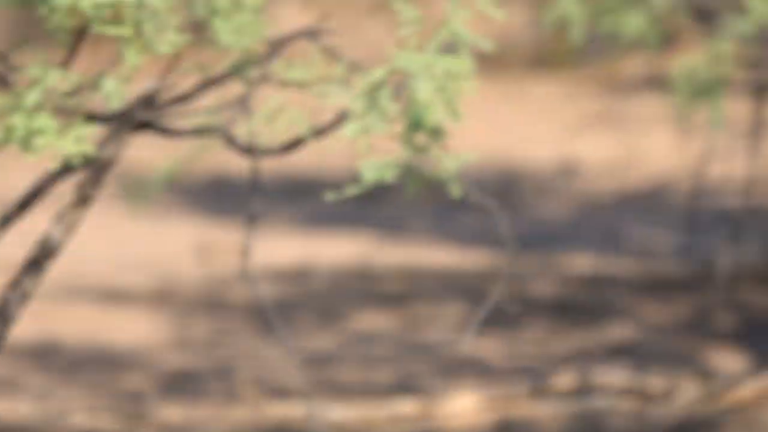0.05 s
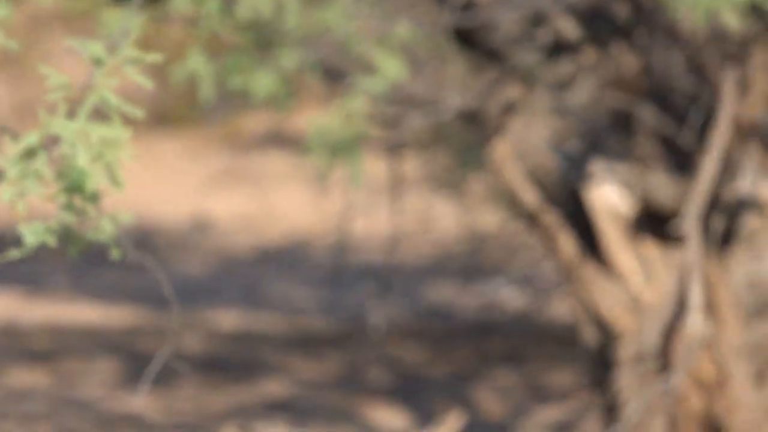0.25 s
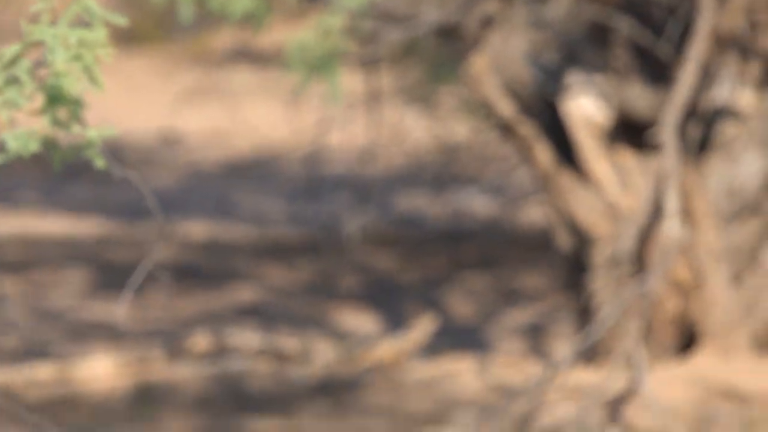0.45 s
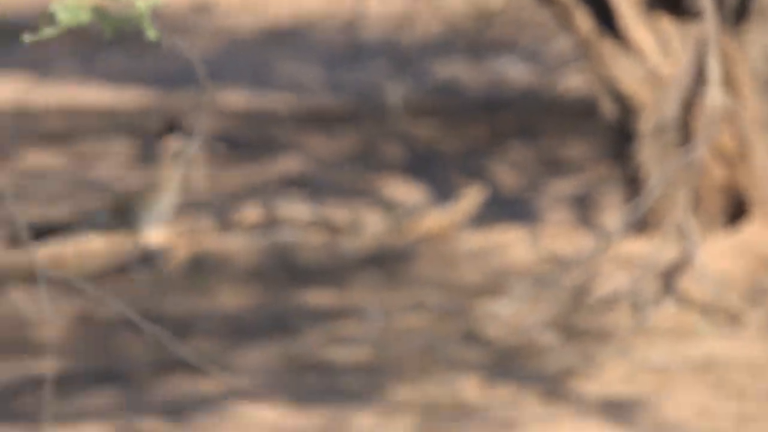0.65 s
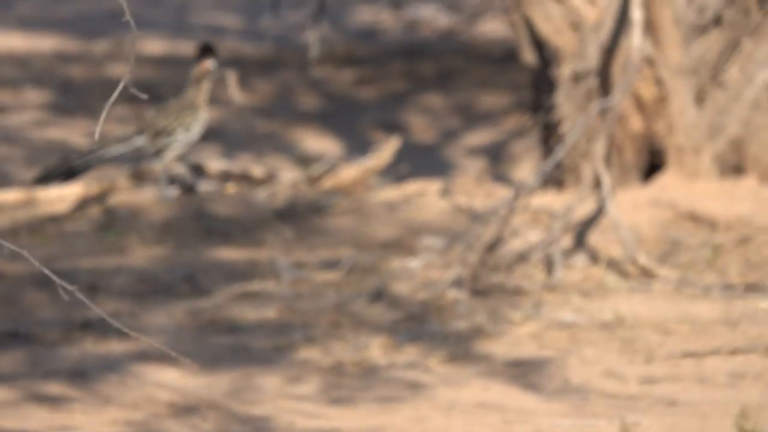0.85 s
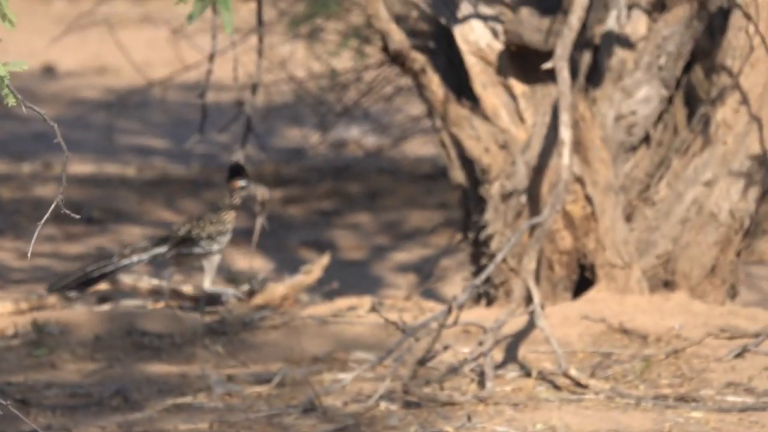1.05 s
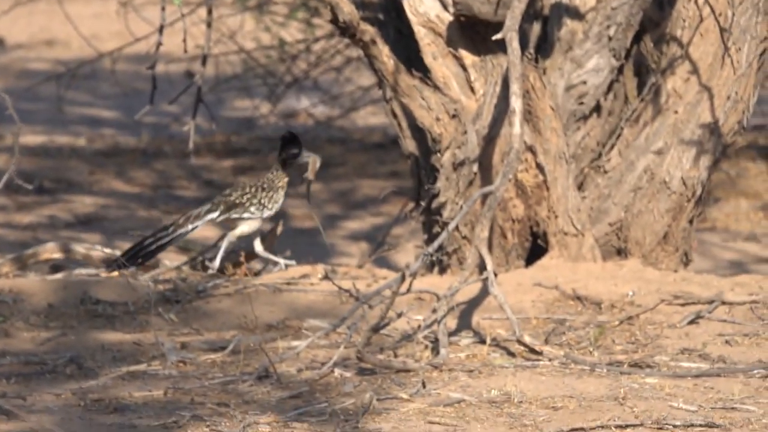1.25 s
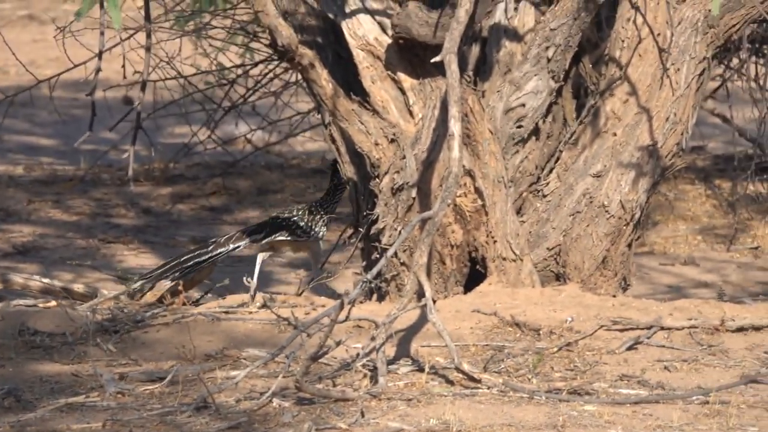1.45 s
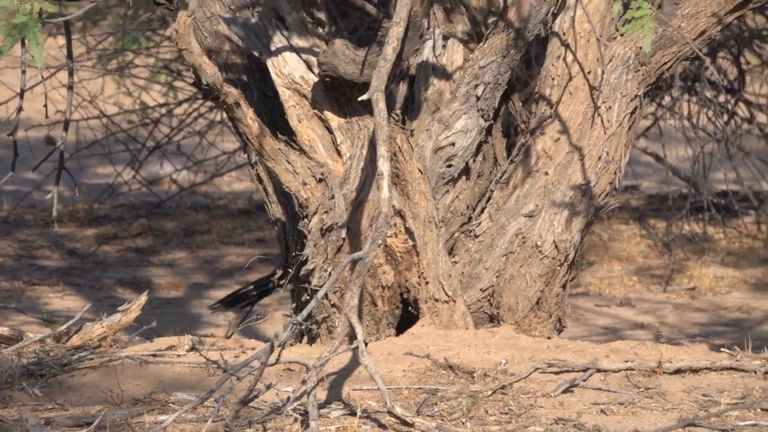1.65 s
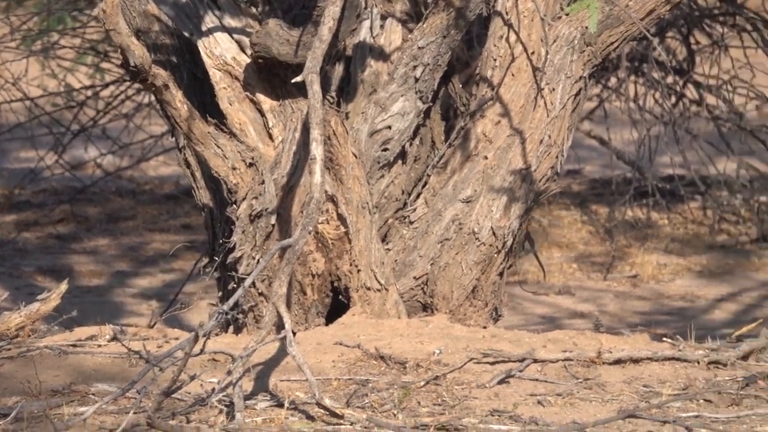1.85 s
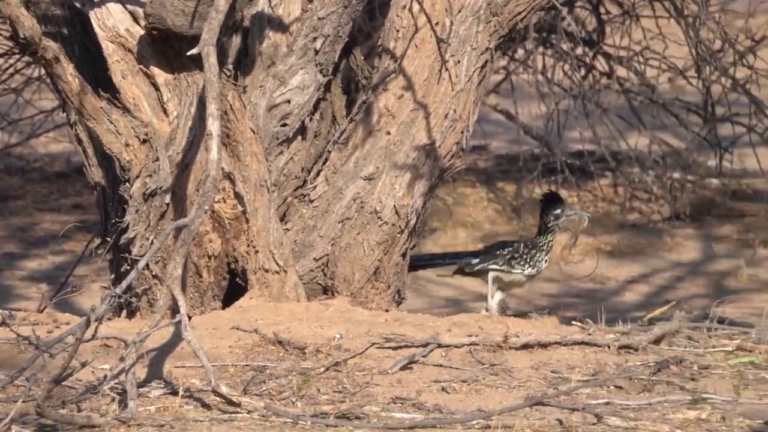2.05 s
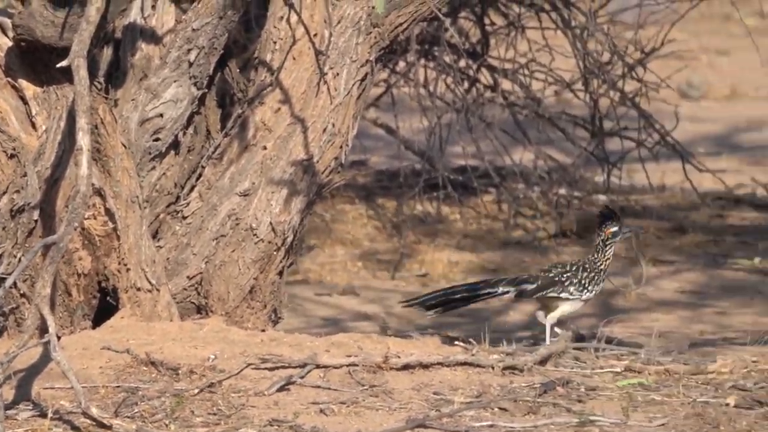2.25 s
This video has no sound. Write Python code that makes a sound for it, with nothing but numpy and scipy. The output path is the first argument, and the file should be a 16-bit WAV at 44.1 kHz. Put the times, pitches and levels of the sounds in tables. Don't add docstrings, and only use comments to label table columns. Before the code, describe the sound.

Cicadas hold a high, dense buzz throughout in open dry woodland; close to the microphone, hands thump and scuff the camera body early on, then a dial clicks, tiny gears tick and motors hum low.

```python
import sys
import numpy as np
from scipy import signal
from scipy.fft import rfft, irfft, next_fast_len
from scipy.io import wavfile
from scipy.ndimage import map_coordinates

SR = 44100
rng = np.random.default_rng(int(sys.argv[2]) if len(sys.argv) > 2 else 0)


def ratio_of_db(decibels):
    return 10 ** (np.asarray(decibels, float) / 20)


def generate_wav(sig):
    pcm = np.round(np.clip(np.atleast_2d(sig).T, -1, 1) * 32767).astype(np.int16)
    wavfile.write(sys.argv[1], SR, pcm)


N = 101429


def rms_one(x):
    return x / np.sqrt(np.mean(x ** 2) + 1e-20)


def in_time(rows):
    s, *columns = np.transpose(rows)
    return [np.interp(np.arange(N) / SR, s, column) for column in columns]


def at_hz(points, hz):
    points = np.array(points)
    return np.interp(np.log(hz), np.log(points[:, 0]), points[:, 1])


def balance(left_over_right_db):
    return ratio_of_db([[left_over_right_db / 2], [-left_over_right_db / 2]])


def drift(rate):
    r = np.exp(-80 * np.pi * rate / SR)
    noise = rng.standard_normal(N // 40 + 2002)
    slow = signal.lfilter([1], [1, -2 * r, r * r], noise)[2000:]
    return np.interp(np.arange(N) / 40, np.arange(len(slow)), rms_one(slow))


def ring(x, hz, t60):
    r = ratio_of_db(-60 / (t60 * SR))
    w = 2 * np.pi * hz / SR
    return signal.lfilter([0, np.sin(w)], [1, -2 * r * np.cos(w), r * r], x + 1e-18)


def resonate(x, peaks):
    out = 0
    for k, (hz, width, db) in enumerate(peaks):
        r = np.exp(-np.pi * 1.5 * width / SR)
        turn = 2 * np.pi * hz / SR
        sos = [(1 - r * r) / 2, 0, (r * r - 1) / 2, 1, -2 * r * np.cos(turn), r * r]
        out = out + (-1) ** k * ratio_of_db(db) * signal.sosfilt([sos, sos], x)
    return out


def coloured(spectrum, patchy_db, low_hz, high_hz):
    # (frequency [Hz], likeness [0..1])
    likeness = [(60, 1), (250, 0.96), (800, 0.97), (2500, 0.49), (5000, 0.07), (9000, 0.58), (12500, 0.55),
                (15000, 0.68)]
    size = next_fast_len(N)
    f = np.maximum(np.fft.rfftfreq(size, 1 / SR), 1)
    alike = np.clip(at_hz(likeness, f), -.99, .99)
    mid, side = rfft(rng.standard_normal((2, size)))
    pair = np.sqrt(1 + alike) * mid + np.sqrt(1 - alike) * side * [[1], [-1]]
    pair = pair * ratio_of_db(at_hz(spectrum, f))
    pair = pair / (1 + (low_hz / f) ** 8) / (1 + (f / high_hz) ** 8)
    octave = np.log2(f / 25)
    shared = drift(6)
    out = 0
    for k in range(11):
        band = irfft(pair * np.clip(1 - abs(octave - k), 0, 1), size)[:, :N]
        out = out + band * ratio_of_db(patchy_db * (shared + drift(13.7)))
    return rms_one(out)


def delayed(x, ms):
    return map_coordinates(x, [np.arange(N) - ms * SR / 1000], order=3, mode="mirror")


def singer(rate, weak_db, peaks, pan_db):
    jitter_s, spread_db = .0001, .8
    ragged, tail_s = .2, .0004
    turns = np.cumsum(rate * np.ones(N)) / SR
    at = np.flatnonzero(np.diff(turns.astype(int)))
    jitter = (jitter_s * SR * rng.standard_normal(len(at))).astype(int)
    at = np.clip(at + jitter, 0, N - 1)
    every_other = np.arange(len(at)) % 2
    buckles = np.zeros(N)
    buckles[at] = ratio_of_db(spread_db * rng.standard_normal(len(at)) + weak_db * every_other)
    tail = signal.lfilter([ragged], [1, -np.exp(-1 / (tail_s * SR))], buckles)
    tail = tail * rng.standard_normal((2, N))
    mid, side = resonate(tail + buckles * [[2], [0]], peaks)
    return rms_one(mid + 1.53 * side * [[1], [-1]]) * balance(pan_db)


def cicadas():
    # (time [s], rate [pulses per s])
    near_rate = [(.15, 159.9), (.8, 157.9), (1.4, 158.8), (1.8, 159.8), (2.3, 159.2)]
    # (time [s], level [dB], far chorus against it [dB])
    insects = [(0, -46, 4.5), (.15, -45, 4), (.4, -44, -0.5), (.62, -43.5, 0), (1.4, -46, 1.5),
               (1.72, -47, -1.5), (2.3, -46.5, 1)]
    # (frequency [Hz], width [Hz], level [dB])
    tymbal = [(9240, 490, 3.5), (9730, 830, -7), (10970, 1330, -9), (9200, 900, -12), (13000, 700, -19.5)]
    # (frequency [Hz], width [Hz], level [dB])
    low_tymbal = [(6508, 440, 3), (7720, 520, 1), (6203, 345, -1.5), (8060, 340, -1)]
    # (frequency [Hz], level [dB])
    chorus = [(7000, -30), (8000, -18.5), (8600, -12), (9350, -10), (11700, -13.5), (13100, -23),
              (13600, -31), (15000, -25.5), (16000, -32)]
    # (time [s], level [dB], left over right [dB])
    low_kind = [(0, -56.5, 6), (.4, -53, 1.5), (.9, -57, 2.5), (1.4, -56, 0), (1.7, -63, 9),
                (2.3, -63.5, 14)]
    # (time [s], delay [ms], share of the direct sound)
    hand_echo = [
        (0, .336, .35),
        (.12, .31, .4),
        (.26, .293, .3),
        (.45, .29, 0),
    ]
    second_rate, weak_db = 310.8, -4

    near = ratio_of_db(-3) * singer(in_time(near_rate)[0], 0, tymbal, pan_db=4.0)
    second = ratio_of_db(-11) * singer(second_rate, weak_db, tymbal, pan_db=2.5)
    far = ratio_of_db(-3.5) * coloured(chorus, .05, 5200, 17600) * balance(2.5)
    level_db, far_db = in_time(insects)
    high = ratio_of_db(level_db) * (near + second + ratio_of_db(far_db) * far)

    ms, share = in_time(hand_echo)
    echo = [delayed(channel, ms) for channel in high]
    high = (high + share * echo) / np.sqrt(1 + share ** 2)

    mid, side = resonate(rng.standard_normal((2, N)), low_tymbal)
    low = rms_one(mid + 0.63 * side * [[1], [-1]])
    low = low + 0.83 * singer(second_rate, weak_db, low_tymbal, pan_db=0)
    low[1] = delayed(low[1], .17)
    low_db, pan_db = in_time(low_kind)
    return high + ratio_of_db(low_db + pan_db * [[.5], [-.5]]) * low


def knocks():
    # (time [s], peak [dB], contact [ms])
    hits = [(0.2057, -8, 1.2), (0.2134, -15.5, 4.1), (0.2193, -8.5, 1.08), (0.2283, -15.5, 3.1),
            (.248, -20, 0.46), (.2522, -13.5, 1.6), (0.2559, -19, 1.3), (0.2608, -19, 2.3),
            (.268, -21, 2.6), (0.2847, -14, 1.54), (0.4256, -18, 2.0), (0.4406, -13.5, 0.89),
            (.4487, -7.5, 1.27), (.457, -14, 1.5), (.62, -32, 3.2), (0.63, -29, 4.8), (0.6538, -26.5, 1.4),
            (.662, -25, 2.7), (0.6632, -22.5, .8), (.671, -21, 3), (.679, -22.5, 5.3), (0.7199, -14, 1.26),
            (0.7289, -19, 2.34)]
    # (frequency [Hz], level [dB], t60 [s])
    body = [
        (115.3, -8, 0.064),
        (239, -16.5, 0.03),
        (44.7, -42, 0.11),
    ]
    t = np.arange(N) / SR
    push = np.zeros(N)
    for s, db, ms in hits:
        u = np.clip((t - s) / (ms * 0.00024) + 2, 0, 60)
        push -= ratio_of_db(db) * u ** 2 * np.exp(2 - u) / 4
    rung = sum(ratio_of_db(db) * 2 * np.pi * hz / SR * ring(push, hz, t60) for hz, db, t60 in body)
    push = signal.lfilter(*signal.butter(4, 1600, fs=SR), push)
    mid = signal.lfilter(*signal.butter(1, 60, "high", fs=SR), push) - rung
    edge = signal.lfilter(*signal.butter(1, [400, 1200], "band", fs=SR), mid)
    return mid + 0.2 * edge * [[-1], [1]]


def swell(s, length, db):
    part = np.clip((np.arange(N) / SR - s) / length, 0, 1)
    return ratio_of_db(db) * np.sin(np.pi * part) ** 1.3


def hands():
    # (time [s], level [dB])
    rub_level = [(0, -42), (.12, -47), (.18, -50.5), (.37, -47.5), (.55, -47.5), (.79, -52.5), (.95, -55.5),
                 (1.12, -55), (1.24, -60.5), (1.36, -53), (1.45, -57.5), (1.68, -65.5), (2.3, -68.5)]
    # (frequency [Hz], level [dB])
    rub_colour = [(25, -8), (55, 12.5), (217, -15), (377, -1.5), (663, -5), (1340, -5), (2420, -24.5),
                  (5000, -33.5)]
    # (time [s], length [s], level [dB])
    scuff_rows = [
        (0.177, .14, -29.5),
        (0.405, 0.073, -34.5),
        (0.484, 0.024, -35),
        (0.612, 0.031, -43),
        (0.64, 0.055, -36),
        (0.528, 0.091, -50.5),
    ]
    # (frequency [Hz], level [dB])
    scuff_colour = [(60, 5.5), (236, -8), (1560, -20), (2160, -26), (3300, -42.5), (6000, -39)]
    # (time [s], length [s], level [dB], centre
    # [Hz])
    slide_rows = [(0.76, 0.33, -53.5, 1420), (0.449, 0.1, -57, 2370), (1.2, 0.13, -57, 1160),
                  (1.32, 0.094, -62, 3600), (1.33, 0.076, -60, 2600), (1.443, 0.16, -66, 2670),
                  (.605, .03, -48, 1200), (0.43, 0.35, -39.5, 57), (2.1, 0.36, -57.5, 340),
                  (0.37, .08, -54, 1460), (1.55, .12, -57.5, 740)]

    rub = ratio_of_db(in_time(rub_level)[0] + 3.5) * coloured(rub_colour, 1.3, 45, 9800)

    mid, side = rng.standard_normal((2, N))
    side = signal.lfilter(*signal.butter(1, 300, "high", fs=SR), side)
    cloth = mid + 0.71 * side * [[1], [-1]]
    slides = 0
    for s, length, db, hz in slide_rows:
        slides = slides + swell(s, length, db) * rms_one(resonate(cloth, [(hz, 0.19 * hz, 0)]))

    grain_db, grains_per_s = 3, 90
    scuffs = sum(swell(*row) for row in scuff_rows) * coloured(scuff_colour, 1.74, 76, 8100)
    return rub + slides + scuffs * ratio_of_db(grain_db * drift(grains_per_s))


def through_body(x):
    # (frequency [Hz], phase [radians])
    port_lag = [(50, .1), (300, .7), (700, .8), (1700, .2)]
    size = 2 ** 17
    lag = at_hz(port_lag, np.maximum(np.fft.rfftfreq(size, 1 / SR), 1))
    return irfft(rfft(x, size) * np.exp(.5j * lag * [[1], [-1]]))[:, :N]


def place(out, s, hit, gain):
    start = int(s * SR)
    out[:, start:start + len(hit)] += gain * hit / abs(hit).max()


def dial_clicks():
    # (time [s], peak [dB], ring [Hz], crack [dB])
    snaps = [(1.1345, -46, 1700, 0), (1.3118, -45, 4600, 7), (1.3212, -35, 1100, 4),
             (1.3235, -35, 1500, -9), (1.3495, -42, 4600, 6), (1.3515, -39, 1150, -9),
             (1.3858, -27, 3400, 4), (1.3862, -33, 4500, 0), (1.3875, -34, 2500, -3),
             (1.3895, -34, 1050, -9), (1.5045, -50, 4200, 0), (1.506, -49, 2500, -6),
             (1.5555, -51, 1900, 0), (1.5955, -44, 1000, -15)]
    # (frequency [Hz], level [dB])
    shell = [(1000, -8), (1600, 3), (2500, 0), (3500, -3.5)]
    out = np.zeros((2, N))
    t = np.arange(1500) / SR
    for s, db, hz, crack_db in snaps:
        crack = rng.standard_normal(len(t)) * np.exp(-t / .0014)
        dull_crack = signal.lfilter(*signal.butter(1, 9000, fs=SR), crack)
        hit = ratio_of_db(4 + crack_db) * dull_crack + 0.45 * ring(crack, hz, .01)
        hit = hit + sum(0.083 * ratio_of_db(g) * ring(crack, f, 0.0093) for f, g in shell)
        place(out, s, hit, ratio_of_db(db))
    return out


def gear_ticks():
    # (time [s], peak [dB], share of the lower notes [dB])
    touches = [
        (1.6957, -52, -8),
        (1.7545, -44, -1),
        (1.9033, -45, 3),
        (1.981, -45, -8),
        (2.0555, -43, -2),
        (2.2065, -48, 4),
        (2.245, -50, -10),
    ]
    # (frequency [Hz], level [dB])
    gear = [(7600, 0), (7100, -4), (6200, -6), (5200, -9), (4000, -18), (2700, -22)]
    out = np.zeros((2, N))
    t = np.arange(1500) / SR
    for s, db, low_db in touches:
        touch = np.exp(-t / .00002) + .1 * rng.standard_normal(len(t)) * np.exp(-t / .001)
        hit = sum(ratio_of_db(g + low_db * (hz < 6000)) * ring(touch, hz, .012) for hz, g in gear)
        place(out, s, hit, ratio_of_db(db) * balance(-3))
    return out


def motors():
    # (time [s], slow motor level [dB], fast motor level [dB])
    hum = [(0, -55, -57.5), (.45, -43, -49.5), (.7, -44, -40.5), (.95, -47, -43), (1.298, -41.5, -45.5),
           (1.5, -44, -40.5), (1.75, -43, -46.5), (1.872, -37.5, -38), (2.02, -36, -37), (2.18, -45, -43),
           (2.3, -51.5, -45)]
    # (multiple of its speed, level [dB], share by which it outgrows the motor)
    slow_orders = [(2, 1, 0.0), (3, -10, 0.94), (4, -23.5, 0.31), (5, -33, 0.98)]
    fast_orders = [(1, -4, -0.81), (2, -0.5, 0.34), (4, -24, 0.054)]
    # (frequency [Hz], width [Hz], level [dB])
    whine_lines = [(1734, 130, -67), (2206, 160, -75.5), (2840, 330, -72.5)]
    # (frequency [Hz], level [dB])
    rumble_colour = [(30, 2), (70, 0), (140, -17), (220, -10), (450, -12), (700, -33)]
    slow_db, fast_db = in_time(hum)
    out = 0
    for hz, orders, level in ((60.16, slow_orders, slow_db), (79.5, fast_orders, fast_db)):
        phase = 2 * np.pi * np.cumsum(hz * (1 + 0.0017 * drift(3.3))) / SR
        for k, db, grows in orders:
            waver_db = 1.2 * drift(4.1) * (k != 2) + 1.6 * drift(21.0)
            gain = ratio_of_db(level + db + grows * (level + 42.5) + waver_db)
            out = out + np.sqrt(2) * gain * np.sin(round(k) * phase + rng.uniform(0, 2 * np.pi))

    rumble = ratio_of_db(fast_db - 15 + 0.1 * (fast_db + 48)) * coloured(rumble_colour, 0.27, 34, 750)

    whine = 0
    for hz, width, db in whine_lines:
        whine = whine + ratio_of_db(db) * rms_one(resonate(rng.standard_normal((2, N)), [(hz, width, 0)]))
    whine_from_s = 1.38
    fade_in = np.clip((np.arange(N) / SR - whine_from_s) / 0.17, 0, 1)
    return out + rumble + whine * fade_in


def still_air():
    # (frequency [Hz], level [dB])
    air = [(25, -2), (50, 4), (130, 2), (300, -3), (668, -20.5), (1300, -40), (3340, -37), (5500, -29)]
    return ratio_of_db(-52) * coloured(air, 0.73, 17, 5400)


def scene():
    handling = through_body(knocks() + hands())
    return cicadas() + handling + dial_clicks() + gear_ticks() + motors() + still_air()


def top_cut(x):
    return signal.sosfilt(signal.butter(12, 16270, fs=SR, output="sos"), x)


def record(dry):
    low_pass = signal.ellip(12, .5, 50, 15750, fs=SR, output="sos")
    mix = signal.sosfilt(low_pass, dry)
    return top_cut(mix)


dry = scene()
out = record(dry)
generate_wav(out)
```